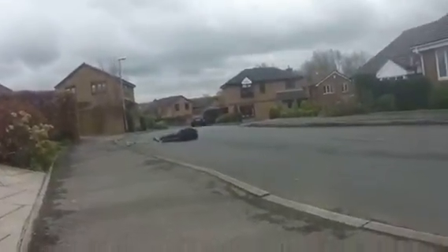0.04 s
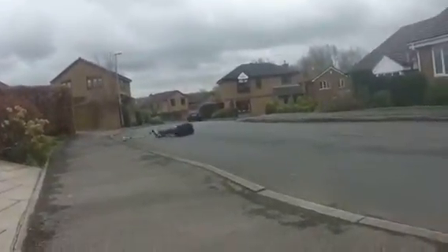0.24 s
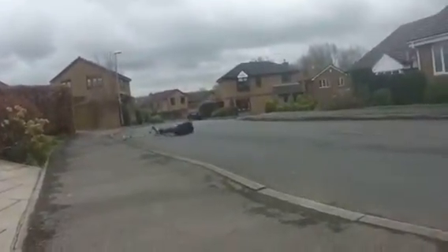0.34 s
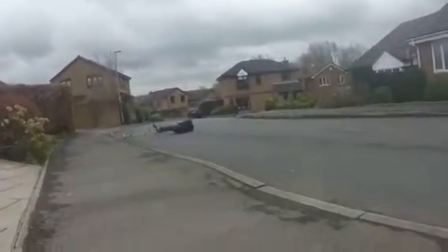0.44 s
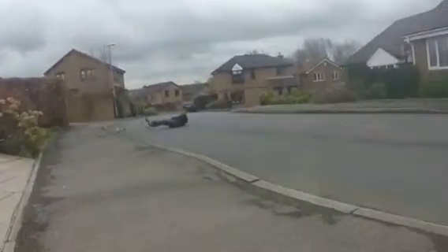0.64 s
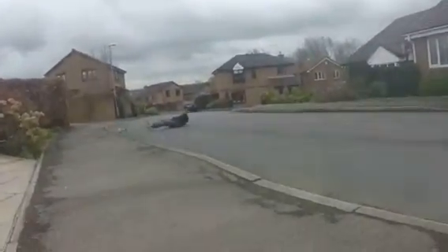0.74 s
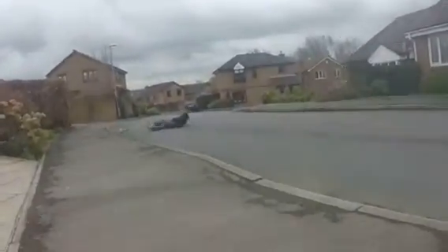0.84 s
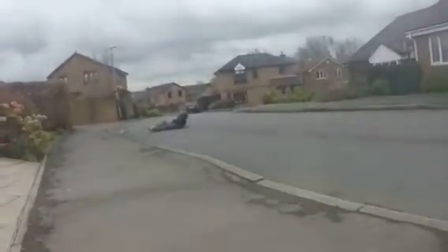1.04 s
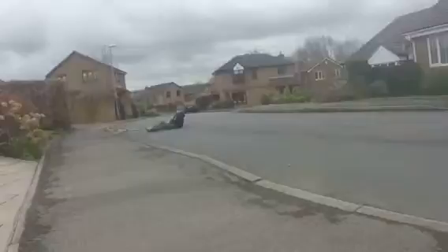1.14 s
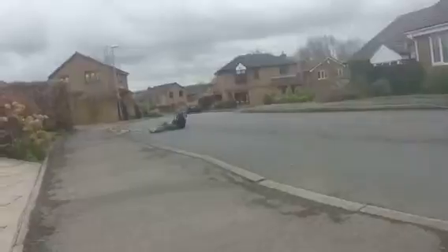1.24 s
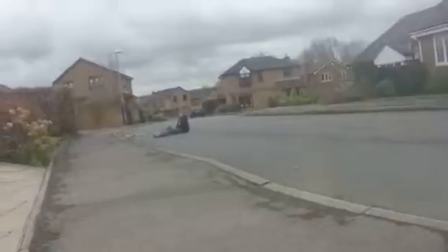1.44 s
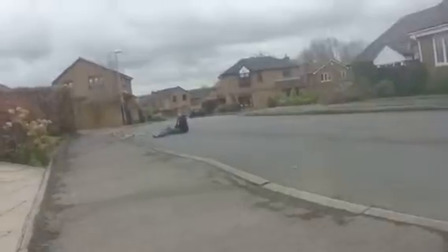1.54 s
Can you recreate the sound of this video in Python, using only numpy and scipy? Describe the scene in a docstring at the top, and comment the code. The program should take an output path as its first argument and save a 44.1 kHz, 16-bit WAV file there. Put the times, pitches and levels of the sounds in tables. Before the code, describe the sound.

A sharp, dry knock hits a hand-held camera's plastic case, right at the microphone, with faint rubbing and ticks around it. Two softer bumps follow over the steady hush of distant traffic on a quiet street.

```python
"""A knock on a camera in a quiet street

Something rubs faintly against a small hand-held camera, making tiny grains of sound and a few ticks.
One sharp, dry knock rings its plastic case. Two soft bumps follow later, the first with a faint buzz.
Behind it all lie a steady hush of distant traffic and air, and a low rumble."""
import sys
import numpy as np
from scipy import signal
from scipy.fft import rfft, irfft
from scipy.io import wavfile
from scipy.ndimage import uniform_filter1d

SR = 44100
rng = np.random.default_rng(int(sys.argv[2]) if len(sys.argv) > 2 else 0)


def bounce(signal):
    """Save signal as a 16-bit WAV file at the path given by the first command-line argument."""
    frames = np.transpose(np.atleast_2d(signal))
    limited = np.clip(frames, -1, 1)
    pcm = np.round(limited * 32767).astype(np.int16)
    wavfile.write(sys.argv[1], SR, pcm)


N = 70560  # 1.6 seconds


def undb(db):
    """Turn decibels into a number to multiply by."""
    return 10 ** (np.asarray(db) / 20)


def unit(x):
    """Scale a signal so that its average strength (rms) is 1."""
    return x / np.sqrt(np.mean(x ** 2))


def colour(x, points):
    """Shape a sound's bass and treble along (Hz, dB) points; the result has strength 1."""
    hz, db = np.array(points, float).T
    freqs = np.maximum(np.arange(N // 2 + 1) * SR / N, 1)
    gain = undb(np.interp(np.log(freqs), np.log(hz), db))
    bass_cut = np.minimum(freqs / hz[0], 1) ** 2
    return unit(irfft(rfft(x) * gain * bass_cut, N))


def band_noise(hz, width_hz):
    """Noise gathered around one pitch, with strength 1."""
    resonance = signal.iirpeak(hz, hz / width_hz, fs=SR)
    return unit(signal.lfilter(*resonance, rng.standard_normal(N)))


def wander(steps_per_s):
    """A smooth random drift up and down, with strength 1."""
    hold = int(SR / steps_per_s)
    steps = rng.standard_normal(N)[np.arange(N) // hold]
    return unit(uniform_filter1d(uniform_filter1d(steps, hold), hold))


def since(start):
    """Seconds since a moment, zero before it."""
    return np.maximum(np.arange(N) / SR - start, 0)


def swell(centre_s, half_length_s):
    """A smooth rise and fall around a moment."""
    return np.exp(-((np.arange(N) / SR - centre_s) / half_length_s) ** 2)


def street():
    """Distant traffic and air: the low part wavers very slightly, the hiss stays smooth."""
    # tone of the street, from rumble to hiss (frequency [Hz], relative level [dB])
    street_tone = [(12, -54), (20, 2), (155, -2.5), (217, -5.5), (249, -4.5), (377, -8.5), (457, -9),
                   (525, -10.5), (656, -11), (733, -12.5), (865, -14), (1390, -17), (1590, -18.5),
                   (2620, -21), (15000, -40.5)]
    air = colour(rng.standard_normal(N), street_tone)
    low = signal.sosfilt(signal.butter(1, 700, fs=SR, output="sos"), air)
    hiss = air - low
    waver_db = -0.07 * wander(steps_per_s=11.6)
    return undb(-54.5) * (hiss + low * undb(waver_db))


def rubbing():
    """Light rubbing close to the microphone: tiny random clicks that swell and fade with each stroke."""
    # strokes against the case (middle [s], half length [s], level [dB])
    strokes = [(0.125, 0.047, -61), (0.307, 0.06, -69)]
    # tone of the rubbing (frequency [Hz], relative level [dB])
    rub_tone = [(500, -15), (1300, -3), (2200, 1), (3800, -9), (5000, -3.5), (6500, -16), (8500, -8),
                (10500, -24), (15000, -25)]
    grains_per_s, spread_db = 1500, 3.5
    signs = np.sign(rng.standard_normal(N))
    sizes = undb(spread_db * rng.uniform(-1, 1, N))
    has_grain = rng.random(N) < grains_per_s / SR
    grains = colour(signs * sizes * has_grain, rub_tone)
    return sum(undb(db) * grains * swell(centre, half) for centre, half, db in strokes)


def ticks():
    """Where the rubbing catches, it ticks: a quick burst of noise around a lower and an upper pitch."""
    # small catches (time [s], level [dB], upper pitch [Hz], its level against the lower one [dB])
    catches = [(0.0153, -58, 5830, -16), (0.0220, -52.5, 5350, -15), (0.0936, -58, 8500, -10),
               (0.1172, -62, 8500, -23), (0.133, -52.5, 8400, -4), (0.2938, -51.5, 9590, -11)]
    fade_s = 0.0028
    out = np.zeros(N)
    for start, db, upper_hz, upper_db in catches:
        age = since(start)
        lower = band_noise(hz=2800, width_hz=1000)
        upper = undb(upper_db) * band_noise(upper_hz, width_hz=1100)
        out += undb(db) * (lower + upper) * np.exp(-age / fade_s) * (age > 0)
    return out


def buzz():
    """A faint high ring lingers after the first soft bump, like a loose part."""
    return undb(-71.5) * band_noise(hz=4200, width_hz=350) * swell(centre_s=1.25, half_length_s=0.04)


def knocks():
    """Each blow rings the case until it is damped. The highest tones die at once, as a snap."""
    # blows on the case (time [s], level [dB], dulled above [Hz], pitch [ratio],
    # build-up [s], free ringing [s])
    blows = [ (0.2089, 0.5, 12000, 1.0, .0004, .008), (1.2103, -14, 3480, 0.82, 0.0018, 0.017),
             (1.5342, -22.5, 5000, 0.95, 0.00023, .009)]
    # the case's own tones (pitch [Hz], level [dB], time to fade by 60 dB [s],
    # first swing [+1 outward, -1 inward])
    case_tones = [(435, -23.5, 0.015, 1), (540, -27, 0.028, 1), (705, -19.5, 0.026, 1),
                  (896, -14.5, 0.009, -1), (1353, -36, 0.03, -1), (1683, -35, 0.027, -1),
                  (2476, -30.5, 0.013, -1), (3400, -40, 0.013, -1), (4170, -37, .022, -1),
                  (5350, -46, .020, -1), (6430, -38, .004, -1), (8900, -41, 0.0024, 1),
                  (11000, -40, 0.0026, -1), (13400, -46, .002, 1)]
    damping_s = 0.003
    out = np.zeros(N)
    for start, db, dull_hz, pitch, rise_s, free_s in blows:
        age = since(start)
        ring = np.zeros(N)
        for hz, tone_db, fade_s, swing in case_tones:
            fade = undb(-60 * age / fade_s)
            ring += swing * undb(tone_db) * np.sin(2 * np.pi * hz * pitch * age) * fade
        build_up = 1 - np.exp(-age / rise_s)
        damping = np.exp(-since(start + free_s) / damping_s)
        treble_cut = signal.butter(1, dull_hz, fs=SR)  # soft contacts sound duller
        out += undb(db) * signal.lfilter(*treble_cut, ring * build_up * damping)
    return out


def scene():
    """The sounds on the camera and the street behind them, added into one channel."""
    return (knocks() + buzz() + rubbing() + ticks() + street())[None, :]


def record(dry):
    """The camera cuts off the very highest treble."""
    top_hz = 15100
    return signal.sosfilt(signal.ellip(10, 0.2, 60, top_hz, fs=SR, output="sos"), dry)


dry = scene()
out = record(dry)
bounce(out)
```